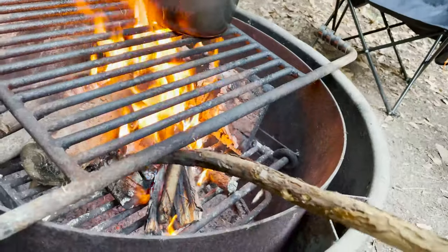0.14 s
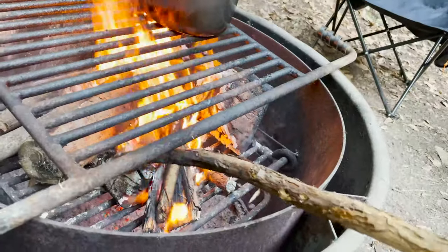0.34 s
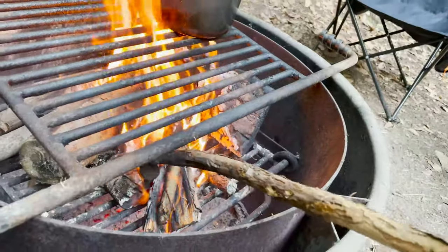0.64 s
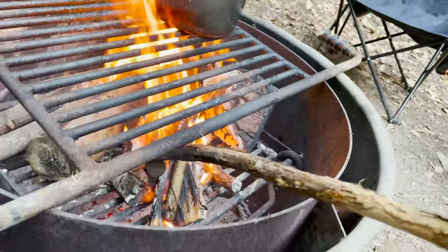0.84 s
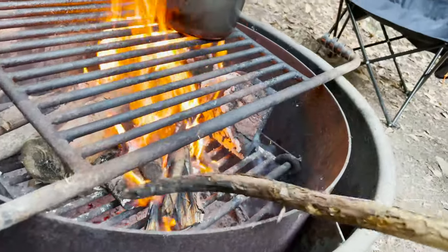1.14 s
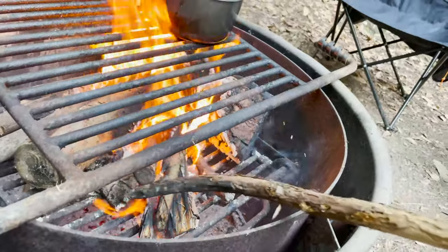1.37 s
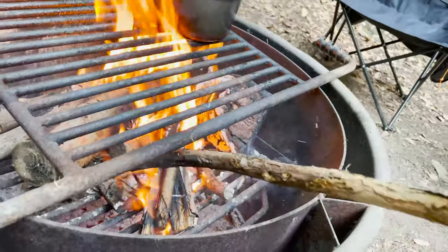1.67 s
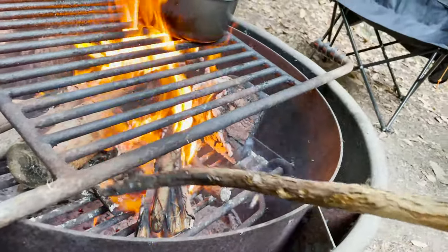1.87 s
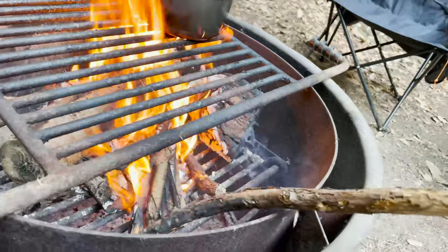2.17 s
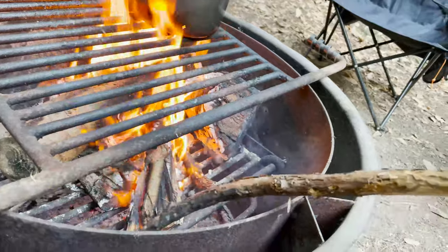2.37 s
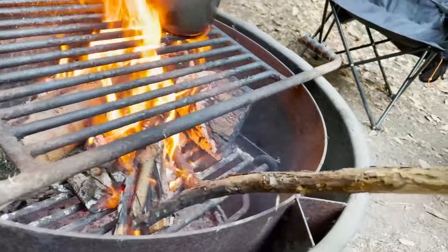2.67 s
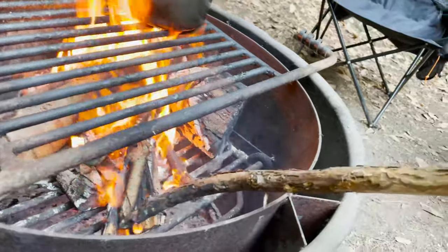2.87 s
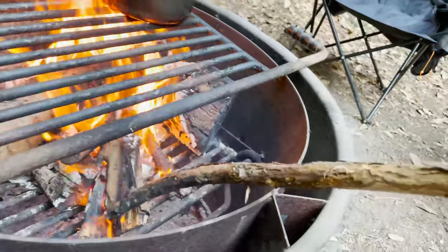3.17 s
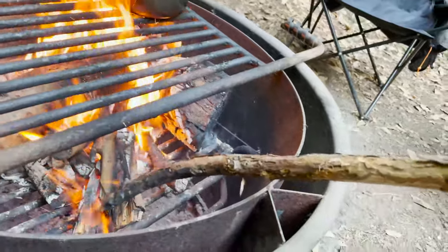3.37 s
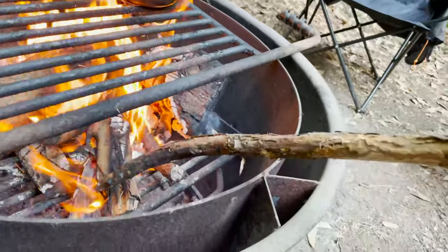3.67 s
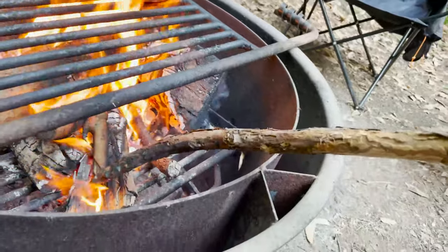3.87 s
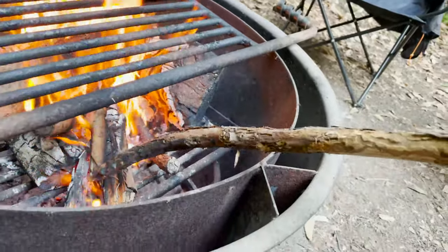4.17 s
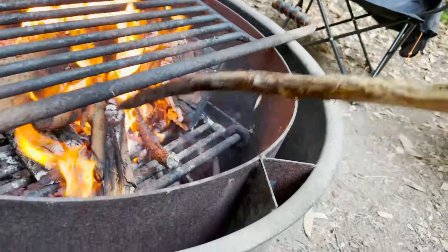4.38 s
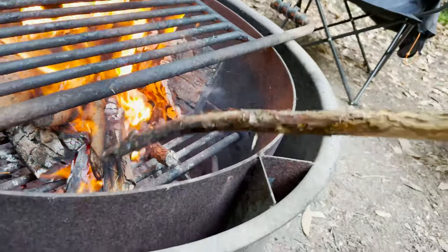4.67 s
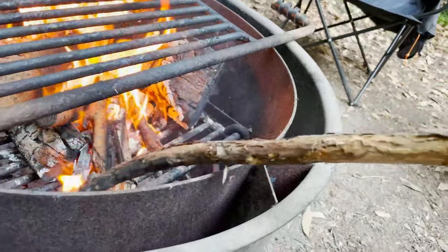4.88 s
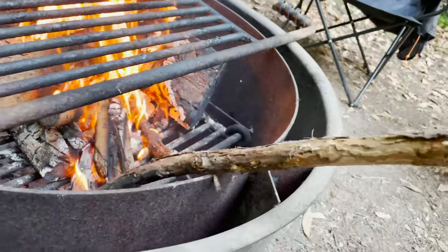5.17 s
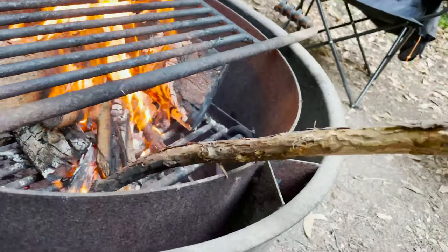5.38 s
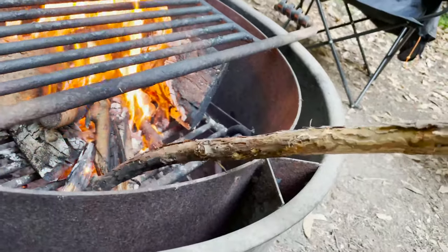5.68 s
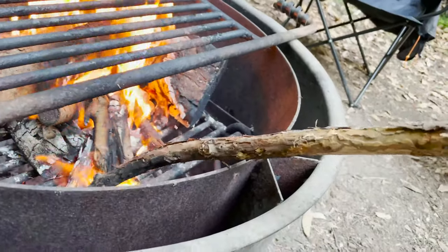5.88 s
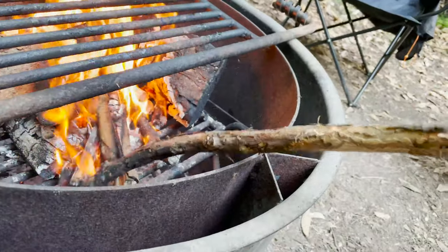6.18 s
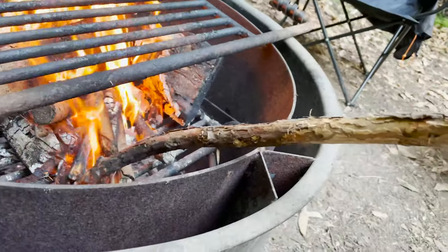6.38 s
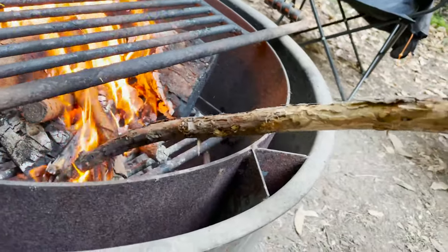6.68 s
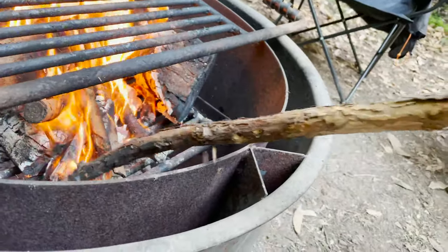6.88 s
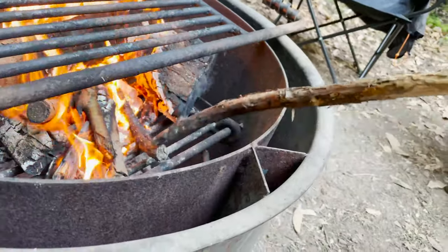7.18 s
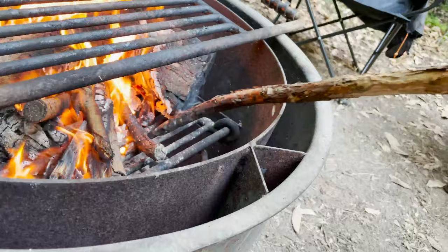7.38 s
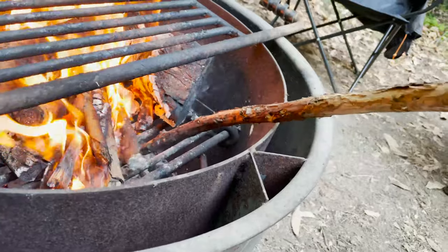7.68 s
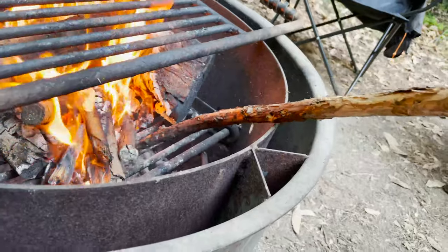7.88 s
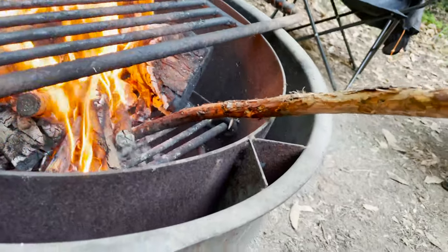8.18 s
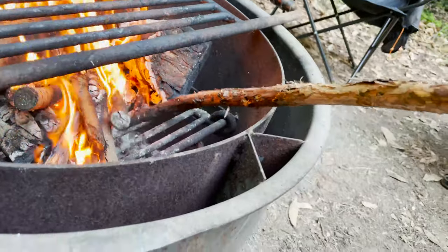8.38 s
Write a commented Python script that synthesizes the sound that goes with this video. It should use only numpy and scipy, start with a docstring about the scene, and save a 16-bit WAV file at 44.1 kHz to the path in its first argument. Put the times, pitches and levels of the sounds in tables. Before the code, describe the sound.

A wood fire burns close by in a steel ring outdoors. Fine crackling, a soft hiss and a low rumble of flames continue throughout. Sharp, dry pops and snaps come irregularly, several each second, with only slight reflections. The strongest fall at about 0.4, 1.5, 3.8, 4.7 and 6.3 seconds, and the loudest at 8.4.

A long stick knocks lightly on the logs right at the start, around 2.2 seconds, in a small cluster near 3.2, and again at 5 and 7. It makes brief, faint scrapes at about 0.3, 3.6 and 8.2 seconds. The metal grate gives one very faint, high ring near 0.7 seconds. Flames catch with a soft, low puff at 1.6 and 5.8 seconds. Underneath, a faint distant low hum swells around 3 seconds and again near 7.

```python
"""A soft hiss and fine crackle rise from a wood fire in a steel ring, over rumbling flames and a distant hum.
Steam pockets burst the wood in sharp pops, each an impulse with a brief cavity resonance, and shed crumbs.
A long stick excites the damped modes of the logs by impact and by stick-slip friction. The grate rings
once, and gas twice catches fire with a puff. The steel walls and the campsite reflect the wood's sounds."""
import sys
import numpy as np
from scipy import signal
from scipy.fft import rfft, irfft, next_fast_len
from scipy.io import wavfile
from scipy.ndimage import map_coordinates

SR = 44100
rng = np.random.default_rng(int(sys.argv[2]) if len(sys.argv) > 2 else 0)


def wrap_up_sound(samples):
    """Save the sound to the file named by the first command line argument, as 16-bit audio."""
    columns = np.atleast_2d(samples).T
    # keep every value between -1 and 1, then stretch to whole-number steps
    tamed = np.clip(columns, -1, 1)
    steps = np.round(tamed * 32767).astype(np.int16)
    wavfile.write(sys.argv[1], SR, steps)


N = 376613

# The loud pops. Each row: start in seconds, level in dB over 10 ms, splinter's lowest ring in Hz,
# brightness in dB per octave, pocket's pitch in Hz, length in ms, left minus right in dB.
POP_EVENTS = [(0.159, -35.5, 6500, -2, 8730, 1.4, 5.5), (0.3861, -21.5, 6400, -6, 7670, 1, -3.5),
              (0.4295, -29, 1560, 2.5, 7500, 1.6, 3.5), (.4827, -25, 6500, -7, 6950, 1.9, 3),
              (0.6633, -30.5, 2760, -2.5, 10700, 3.1, 2), (0.6804, -29, 500, 3, 3120, 1.5, 3),
              (0.6938, -28.5, 970, -1.5, 1770, 1.8, -3.5), (0.7409, -33, 1070, -2, 5400, 5, 2),
              (.9142, -30.5, 2780, -5, 2280, 2.1, -3), (.9659, -41, 1420, -1, 9280, 2.4, 0),
              (1.0867, -32, 6500, -3.5, 5330, 1, -3), (1.1547, -34.5, 2510, -1.5, 2370, 11, 5),
              (1.165, -26.5, 1890, -3.5, 2320, 6.2, -3.5), (1.2984, -30, 970, 1, 5800, 5.7, 0),
              (1.509, -20, 4450, -6, 7600, 2.9, 3.5), (1.541, -28, 2510, -6, 2260, 1.6, -4),
              (1.6245, -33, 500, 3.5, 6140, 1.2, 9), (1.642, -33.5, 5380, -4.5, 5000, 2.4, 0),
              (1.6863, -36.5, 2760, -5, 3600, 5.8, -3.5), (1.7302, -29.5, 2510, -3, 3070, 1.3, 2.5),
              (1.759, -33.5, 2510, -7, 6200, 3.1, 2), (1.8117, -32.5, 500, 4, 7500, 3.3, 3.5),
              (1.8453, -25, 1710, 0, 9000, 3.9, 3), (2.0974, -36, 1890, 0, 5100, 12, 2.5),
              (2.1499, -35.5, 500, 4, 9000, 1.9, -1), (2.194, -30.5, 660, -.5, 4020, 6.2, 0.5),
              (2.3159, -37, 1420, -3, 8050, 2.3, -2), (2.578, -37.5, 3680, -4, 2590, 1.4, -3),
              (2.6148, -37, 880, 0.5, 6150, 12, 3), (2.7208, -34, 6500, -6.5, 5100, .8, -2),
              (2.743, -30, 5380, -8, 7450, 1.4, 1), (2.8185, -26.5, 2270, -3, 3520, 3.2, 1.5),
              (3.1142, -35, 890, -4.5, 1380, 6.2, 4), (3.1653, -35, 500, -3.5, 2460, 5.3, -8),
              (3.1843, -30, 500, -1, 7320, 1.1, -5), (3.2692, -33.5, 2510, -4.5, 3650, 3.5, 0),
              (3.5041, -32.5, 1070, -0.5, 3720, 0.95, 0), (3.583, -31, 660, -2, 6300, 2.4, -4),
              (3.6841, -33.5, 1720, -3.5, 1730, 3.8, -3), (3.806, -18.5, 6600, -5, 7470, 2, -3.5),
              (3.8663, -37.5, 1070, 0, 9200, 3.6, 0), (3.941, -32.5, 2070, -6, 3560, 4.7, 0),
              (4.0781, -24.5, 800, 2, 8300, 1.8, 0), (4.1804, -34, 1070, -.5, 2450, 4.4, 4),
              (4.2677, -35, 500, 7, 9300, 3.6, 0), (4.3895, -36, 1070, -2, 5000, 8.6, -3),
              (4.6524, -22, 1480, -4.5, 1660, 3.7, 3.5), (4.7028, -30.4, 1180, 2.5, 4150, 2.5, 0),
              (4.7501, -36, 3040, -8, 5500, 5.9, -3), (4.7837, -31, 600, -0.5, 7100, 3.3, 3.5),
              (4.8443, -39, 6500, -3, 7140, 4.4, -5), (4.9983, -32, 550, -0.5, 5350, 2.3, -3),
              (5.1052, -34, 730, -1, 3400, 18, 3), (5.2221, -34, 2290, -3, 1590, 10, 2.5),
              (5.2906, -28.5, 3040, -5.5, 2570, 2.2, 3.5), (5.4351, -31, 2290, -2.5, 3370, 2.2, -3),
              (5.4852, -25.5, 660, 1, 7270, 2.2, -3.5), (5.5668, -29.5, 3680, -7, 5030, 1.4, 3),
              (5.6504, -32, 497, 0, 5870, 1.6, 3.5), (5.8819, -25.5, 1150, -3, 2310, 1.67, 3.5),
              (5.9199, -34, 500, 2, 5200, 1.8, 3), (5.9911, -34.4, 960, -1, 2140, 2.5, 2),
              (6.1486, -37, 1420, 2, 8170, 3.4, 1), (6.2428, -37.5, 1180, -3, 8200, 4.4, 0),
              (6.292, -21.5, 1420, 4.5, 8400, 1.1, 0.5), (6.3261, -28, 800, 0, 4050, 2.7, 3),
              (6.3794, -35, 3680, -9, 4410, 6.4, 0), (6.3952, -31.5, 6500, -6, 8370, .6, 2.5),
              (6.4877, -35, 1560, .5, 6130, 8.3, 4), (6.5063, -26.5, 660, 1, 4850, 2.8, 3),
              (6.683, -35, 2290, -7, 5700, 1.9, 3), (6.781, -35, 970, -1, 1600, 2.7, -2.5),
              (6.9287, -31.5, 2080, -4.5, 2380, 4.7, -4), (7.0361, -33.5, 500, -2, 5230, 1.8, -1),
              (7.1578, -34, 2510, -5, 3700, 4.5, 0), (7.2693, -29.2, 2730, -3, 3070, 5.3, -2.5),
              (7.3438, -31, 5380, -6.5, 4330, 2.6, -3.5), (7.4591, -30, 5910, -2, 5600, 1.8, -3),
              (7.472, -25, 1180, -0.5, 8100, 2.9, 3), (7.6655, -26.5, 1550, -2.5, 9750, 4.3, 3),
              (7.6922, -34.5, 1070, 1, 2130, 6.8, 1), (7.8517, -24.5, 3400, -6.5, 6550, 3, -3.5),
              (7.8723, -28.5, 500, 1, 4790, 2.1, -2), (7.9285, -28.5, 1910, -3, 1760, 2.5, 1),
              (7.994, -28.5, 2200, -1, 2930, 2.7, -3.5), (8.002, -24.5, 1900, -2, 1760, 1.1, -.5),
              (8.037, -31.5, 3040, -2.5, 2650, 1.7, -3.5), (8.218, -34.5, 730, 1, 6950, 3, 4),
              (8.392, -36.5, 6550, -3, 7500, 1.6, -2), (8.4205, -17, 656, 0, 4370, 2.2, 0),
              (8.5265, -34.5, 3360, -7.5, 2400, 2.7, 3)]
# How lively the fire is. Each row: time in seconds, relative level in dB.
LIVELINESS = [(0, -44), (.5, -44.5), (1.2, -43), (1.75, -43.5), (1.98, -46.5), (2.2, -44), (2.6, -44.5),
              (3.0, -43.5), (3.7, -44.5), (3.95, -42.5), (4.2, -44), (4.7, -42.5), (5.3, -44.5),
              (5.75, -43), (6.35, -42.5), (7.4, -44.5), (8.0, -44.5), (8.54, -43.5)]
# How alike the two ears' signals are. Each row: frequency in Hz, coherence from 0 to 1.
COHERENCE = [(60, 0.98), (130, 0.85), (290, 0.85), (640, 0.74), (1400, 0.84), (2200, 0.96), (4000, 0.94),
             (7000, 0.78), (11500, 0.94), (15000, 0.43)]


def from_db(db):
    """Decibels to amplitude ratio."""
    return 10 ** (np.asarray(db) / 20)


def rms_one(x):
    """Normalise to rms 1."""
    return x / np.sqrt(np.mean(x ** 2) + 1e-20)


def unit_energy(x):
    """Normalise each row to energy 1."""
    return x / np.sqrt(np.sum(x ** 2, axis=-1, keepdims=True) + 1e-20)


def in_time(curve):
    """Interpolate a curve to one value per sample."""
    return np.interp(np.arange(N) / SR, *np.transpose(curve))


def at_hz(spectrum, hz):
    """Interpolate a spectrum on a log-frequency axis."""
    knots_hz, values = np.transpose(spectrum)
    return np.interp(np.log(np.maximum(hz, 1)), np.log(knots_hz), values)


def drift(rate):
    """Smooth random modulation of rms 1, through `rate` random values a second."""
    knots = rng.standard_normal(int(rate * N / SR) + 2)
    return rms_one(map_coordinates(knots, [np.arange(N) / SR * rate], order=3, mode="nearest"))


def stereo_noise(spectrum):
    """Partial coherence: coloured noise of rms 1, partly alike in both ears."""
    size = next_fast_len(N)
    hz = np.fft.rfftfreq(size, 1 / SR)
    mid, side = rfft(rng.standard_normal((2, size))) * from_db(at_hz(spectrum, hz))
    alike = at_hz(COHERENCE, hz)
    ears = np.sqrt(1 + alike) * mid + np.sqrt(1 - alike) * side * [[1], [-1]]
    return rms_one(irfft(ears, size)[:, :N])


def hiss():
    """Amplitude-modulated broadband noise: the hiss flickers and follows the fire's liveliness."""
    # The hiss spectrum. Each row: frequency in Hz, relative spectral density in dB.
    spectrum = [(250, -11), (450, 3.5), (700, 2.5), (1000, 0), (1700, 2), (3000, 0.5), (5000, 0), (8500, 1),
                (12000, -4.5), (15800, -10)]
    level_db = in_time(LIVELINESS) - 2.5 + 1.23 * drift(40)
    return from_db(level_db) * stereo_noise(spectrum)


def rumble(level_db=-48.5):
    """Combustion noise: the flames radiate mostly low frequencies, at a gently wavering level."""
    # The flames' spectrum. Each row: frequency in Hz, relative spectral density in dB.
    spectrum = [(25, -33), (45, -6), (60, -1), (85, -2.5), (125, -1), (165, -10), (200, -17.5),
                (290, -11.5), (420, -22), (800, -27.5), (2000, -54)]
    return from_db(level_db + 0.84 * drift(5)) * stereo_noise(spectrum)


def hum(pitch_hz=67.7, waver_hz=1.744, flutter_db=1.0):
    """Frequency and amplitude modulation: a distant low tone wavers in pitch and level."""
    # The hum's swells. Each row: time in seconds, relative level in dB.
    swells = [(0, -58.0), (0.7, -54.5), (1.1, -52.5), (2, -47), (2.7, -43), (3.4, -45), (3.8, -51),
              (4.4, -56), (5.1, -51.0), (5.5, -52), (6.2, -48), (6.8, -45), (7.2, -47.5), (8.2, -48.0),
              (8.54, -49)]
    phase = 2 * np.pi * np.cumsum(pitch_hz + waver_hz * drift(9)) / SR
    tone = rms_one(np.sin(phase) * from_db(flutter_db * drift(7.5)))
    return from_db(in_time(swells) - 1) * tone


def bursts(rows, crack, pocket, pocket_s, tail_db, tail_s=0.0073):
    """Impulsive fracture: fibres tear, wood snaps, the pocket resonates and the logs scatter the sound."""
    # The spectrum of breaking wood. Each row: frequency in Hz, gain in dB.
    wood_colour = [(1000, -2), (4000, -0.5), (8000, -0.5), (11000, -2.5), (15500, -11), (18000, -43)]
    starts, level_db, low_hz, tilt, pocket_hz, length_ms, pan_db = np.array(rows, float).T[:, :, None]
    size, lead = 2048, 256  # samples in a burst, and ahead of its snap
    t = (np.arange(size) - lead) / SR
    after = np.maximum(t, 0)
    hz = np.fft.rfftfreq(size, 1 / SR) + 1
    length = np.maximum(length_ms, .3) / 1000
    noise = rng.standard_normal((len(starts), 3, size))
    tearing = (t < 0) * (t > -.65 * length - .0007) * np.exp(np.minimum(t, 0) / length)
    scatter = (t >= 0) * (np.exp(-after / length) + from_db(tail_db) * np.exp(-after / tail_s))
    snap = unit_energy(noise[:, 2] * (t >= 0) * np.exp(-after / .0001))
    cavity = unit_energy(np.sin(2 * np.pi * pocket_hz * after) * np.exp(-after / pocket_s))
    mid = unit_energy(noise[:, 0] * (tearing + scatter)) + crack * snap
    side = noise[:, 1] * (tearing + scatter)
    colour = from_db(at_hz(wood_colour, hz) + tilt * np.log2(hz / 1000))
    # small splinters radiate no lows, and even large ones hardly any bass
    colour /= np.sqrt((1 + (low_hz / hz) ** 4) * (1 + (380 / hz) ** 6))
    mid, side = unit_energy(irfft(rfft([mid, side]) * colour))
    mid = unit_energy(mid + pocket * cavity)
    # each burst also differs slightly between the two ears
    alike = at_hz(COHERENCE, hz)
    side = irfft(rfft(side) * from_db(-20) * np.sqrt((1 - alike) / (1 + alike)))
    gain = from_db(level_db) * np.sqrt(SR / 100)  # level over 10 ms
    out = np.zeros((2, N))
    for k, start in enumerate(starts[:, 0]):
        ears = mid[k] + side[k] * [[1], [-1]]
        add(out, start - lead / SR, gain[k] * ears * pan(pan_db[k]))
    return out


def add(out, start, sound):
    """Superposition: mix a sound in from `start` seconds on."""
    at = int(np.clip(round(start * SR), 0, N - 1))
    out[..., at:at + sound.shape[-1]] += sound[..., :N - at]


def pan(db):
    """Interaural level difference: left and right gains that lie `db` apart."""
    return from_db(db * np.array([[.5], [-.5]]))


def small_bursts(starts, level_db):
    """Small fractures of random pitch and place; the stronger ones tear for longer."""
    low, bright, cavity, length, place = rng.random((len(starts), 5)).T
    low_hz, pocket_hz = 750 * 5 ** low, 1500 * 5.5 ** cavity
    tilt, pan_db = 0.5 + 7 * (bright - .5), 6 * (place - .5)
    length_ms = (0.54 + 2.1 * length) * from_db(.2 * (level_db + 45.5))
    rows = np.transpose([starts, level_db, low_hz, tilt, pocket_hz, length_ms, pan_db])
    return bursts(rows, crack=0.4, pocket=0.37, pocket_s=.0021, tail_db=-16)


def crackle(per_second=95, strongest_db=5.5, range_db=12.5):
    """A random point process: small bursts, mostly weak, come louder and denser in a livelier fire."""
    lively_db = in_time(LIVELINESS)
    count = int(per_second * N / SR)
    when, weakness = np.random.default_rng(rng.integers(2 ** 31)).random((count, 2)).T
    cumulative_rate = np.cumsum(from_db(lively_db))
    at = np.searchsorted(cumulative_rate, when * cumulative_rate[-1])
    return small_bursts(at / SR, lively_db[at] + strongest_db - range_db * weakness ** 0.69)


def reflections(x, t60, dull_hz, side):
    """Reverberation: dense, low-passed reflections arrive after 3 ms and decay exponentially."""
    t = np.arange(SR // 2) / SR
    envelope = unit_energy((t > .003) * from_db(-60 * t / t60))
    shared, apart = rng.standard_normal((2, len(t))) * envelope
    lowpass = signal.butter(1, dull_hz, fs=SR, output="sos")
    response = signal.sosfilt(lowpass, shared + side * apart * [[1], [-1]])
    return signal.fftconvolve(x, response, axes=1)[:, :N]


def log_ring(hz, t60):
    """Modal damping: in a log's impulse response the higher modes die sooner."""
    # A log's modes. Each row: multiple of its pitch, relative level in dB.
    modes = [(1, 1.5), (1.33, -8), (1.85, -10), (4.6, -15)]
    t = np.arange(SR // 2) / SR
    return sum(from_db(db - 60 * t * np.sqrt(ratio) / t60) * np.sin(2 * np.pi * hz * ratio * t)
               for ratio, db in modes)


def knocks():
    """Impact excitation: each knock sets a log in free vibration."""
    # Stick and logs knocking. Each row: start in seconds, gain in dB, pitch in Hz,
    # time to decay by 60 dB in seconds, left minus right in dB.
    impacts = [(0.1216, -29.5, 920, 0.0069, -7.5), (0.252, -38.5, 740, 0.034, 0),
               (2.196, -39, 653, 0.041, 0), (3.113, -42, 533, 0.064, 3), (3.171, -38.5, 330, 0.071, -12),
               (3.176, -30, 197, 0.2, -4), (4.999, -34.5, 654, 0.021, -3), (7.0362, -29.5, 670, 0.034, -1)]
    out = np.zeros((2, N))
    for start, gain_db, hz, t60, pan_db in impacts:
        add(out, start, from_db(gain_db) * pan(pan_db) * log_ring(hz, t60))
    return out


def pops():
    """Sudden pressure release: steam bursts the wood, and the opened pocket rings briefly."""
    return bursts(POP_EVENTS, crack=.42, pocket=.33, pocket_s=.0022, tail_db=-13)


def crumbs(per_pop=2, mean_delay_s=.028, under_pop_db=20, spread_db=6.5):
    """Secondary fracture: bits of charcoal break off just after each pop."""
    pop_s, pop_db = np.repeat(np.array(POP_EVENTS)[:, :2], per_pop, axis=0).T
    level_db = pop_db - under_pop_db + spread_db * (2 * rng.random(len(pop_s)) - 1)
    return small_bursts(pop_s + rng.exponential(mean_delay_s, len(pop_s)), level_db)


def scrapes(slips_per_s=750):
    """Stick-slip friction: the dragged stick catches unevenly, and each slip rings the log."""
    # The stick's strokes. Each row: start in seconds, length in seconds, level in dB, pitch in Hz.
    strokes = [(0.24, .14, -45, 296), (3.562, 0.11, -52, 400), (8.21, 0.143, -53, 278)]
    out, t = np.zeros(N), np.arange(SR // 2) / SR
    for start, length, level_db, hz in strokes:
        slips = (rng.random(len(t)) < slips_per_s / SR) * rng.standard_normal(len(t))
        rubbing = rms_one(signal.fftconvolve(slips, log_ring(hz, t60=.06))[:len(t)])
        swell = np.sin(np.pi * np.minimum(t / length, 1))
        add(out, start, from_db(level_db) * rubbing * swell)
    return out


def grate(touch_s=.745, level_db=-46.5):
    """Lightly damped vibration: a spark or chip touches the grate, and the steel bars ring faintly."""
    # The bars' modes. Each row: frequency in Hz, relative level in dB, time to decay by 60 dB in seconds.
    modes = [(3130, 0, 0.52), (3720, -10.5, .12), (4457, -1, 0.38)]
    out, t = np.zeros(N), np.arange(SR // 2) / SR
    for hz, db, t60 in modes:
        add(out, touch_s, from_db(level_db + db - 60 * t / t60) * np.sin(2 * np.pi * hz * t))
    return out


def puffs(end_hz=85, swell_s=0.00304, fade_s=0.064):
    """An expanding source: as a ball of flame swells, its pitch drops quickly to a soft thump."""
    # Pockets of gas catching fire. Each row: start in seconds, level in dB, starting pitch in Hz.
    ignitions = [(1.624, -35, 1420), (5.799, -35, 332)]
    out, t = np.zeros(N), np.arange(SR // 5) / SR
    for start, level_db, start_hz in ignitions:
        hz = end_hz + (start_hz - end_hz) * np.exp(-t / swell_s)
        phase = 2 * np.pi * np.cumsum(hz) / SR
        add(out, start, from_db(level_db) * np.exp(-t / fade_s) * np.sin(phase))
    return out


def scene():
    """Superposition: the wood's direct sound and its reflections add to hiss, flames and hum."""
    direct = pops() + crumbs() + crackle() + knocks() + scrapes() + grate()
    steel_walls = from_db(-6) * reflections(direct, t60=0.055, dull_hz=1900, side=0.1)
    campsite = from_db(-14.5) * reflections(direct, t60=0.3, dull_hz=6950, side=0.087)
    return direct + steel_walls + campsite + hiss() + rumble() + puffs() + hum()


def record(dry):
    """Soft saturation rounds the sharpest peaks, and a steep low-pass cuts above 16 kHz."""
    lowpass = signal.ellip(10, .1, 80, 16000, fs=SR, output="sos")
    return signal.sosfilt(lowpass, np.tanh(dry))


dry = scene()
out = record(dry)
wrap_up_sound(out)
```